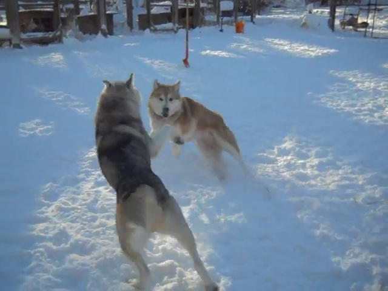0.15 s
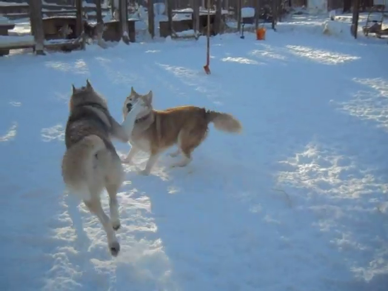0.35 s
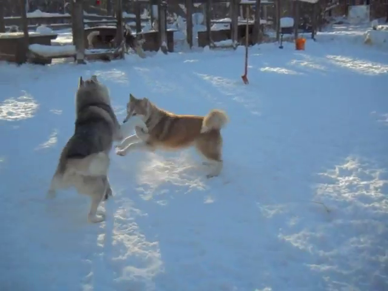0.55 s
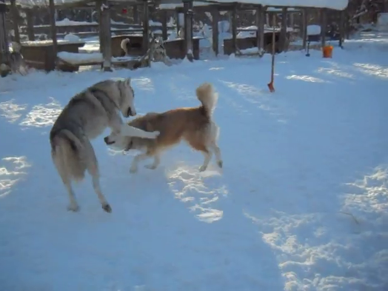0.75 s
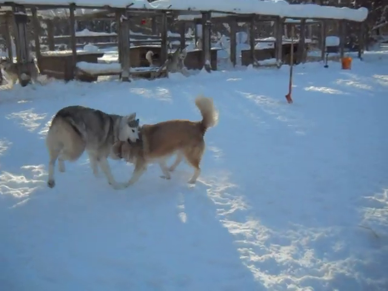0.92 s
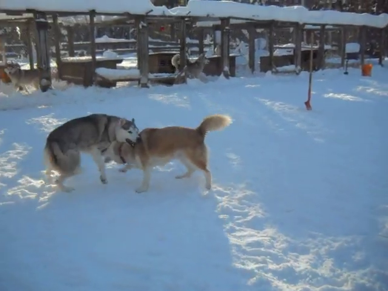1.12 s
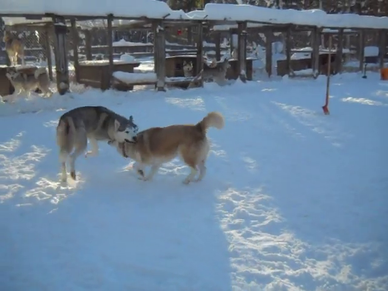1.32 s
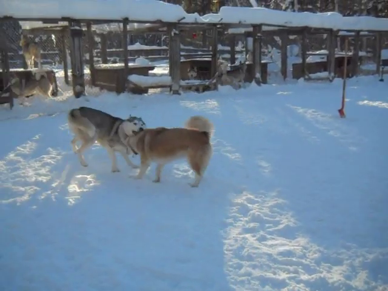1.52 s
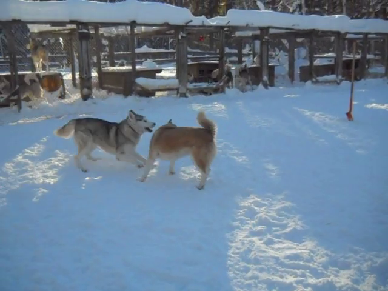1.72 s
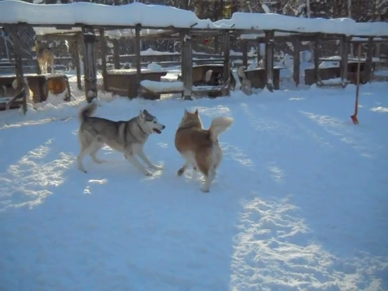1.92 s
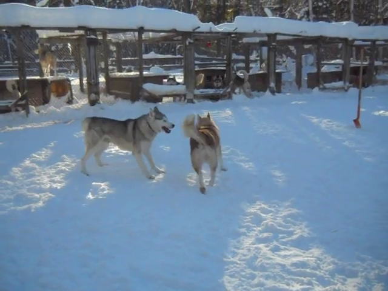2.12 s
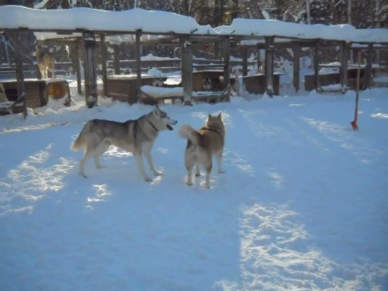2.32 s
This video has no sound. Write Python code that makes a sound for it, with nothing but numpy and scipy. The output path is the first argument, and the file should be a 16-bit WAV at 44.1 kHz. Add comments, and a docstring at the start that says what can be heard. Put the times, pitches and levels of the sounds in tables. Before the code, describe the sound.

Dog yelps and barks sharply in a snowy yard, with a whine and soft paw crunches

```python
"""Two dogs wrestle in a snowy yard: a sharp yelp, a harsh bark that runs into a whine, another bark over a low
grumble, a soft yip and small whimpers. Each call is a stack of harmonics, with jitter and noise where it is rough.
Paws crunch in the snow as swells of tiny random cracks, with dull thumps, over faint outdoor air made of noise.
The yard throws back a weak echo of the dogs. A small narrow-band recorder ducks when the sound gets loud,
recovers slowly and clips the loudest peaks."""
import sys
import numpy as np
from scipy import signal
from scipy.fft import rfft, irfft
from scipy.io import wavfile

SR = 44100
rng = np.random.default_rng(int(sys.argv[2]) if len(sys.argv) > 2 else 0)


def to_wav(s):
    """Save 16-bit WAV."""
    ch = np.atleast_2d(s).T  # columns
    pcm = np.round(np.clip(ch, -1, 1) * 32767)  # PCM
    wavfile.write(sys.argv[1], SR, pcm.astype(np.int16))


N = 103635   # length in samples
T = np.arange(N) / SR   # time in seconds

# The dogs' calls, one table each. Each row: time in seconds, pitch in Hz, level in dB, 2nd harmonic in dB
# and 3rd harmonic in dB (both relative to the level, before the mouth shapes them), roughness from 0 to 1.
YELP_PATH = [(.245, 735, -11.5, -23, -28.5, 0), (.257, 762.3, -4.5, -22.5, -22.5, 0.1),
             (.265, 830.8, 1, -9, -16.5, 0), (.279, 925.5, 11, -7, -22.5, .06),
             (.292, 945, 14, -24.5, -52.5, 0.07), (.324, 974.4, 10, -29, -23.5, 0),
             (.335, 1039, -1, -10, -47.5, 0.16), (.346, 1105, -3, -14.5, -44, 0),
             (.38, 1159, -15, -31.5, -35.5, 0.05)]
BARK_PATH = [(0.669, 622.4, -9.5, -13, -17.5, 0.029), (.683, 635.8, -4, -4.5, -7, 0.03),
             (0.692, 684, 5.5, -10, -17.5, 0.051), (0.71, 712.5, 6, -19, -19.5, 0.16),
             (0.716, 748.3, 7, -8, -21.5, 0.59), (0.743, 697.3, 2.5, -12, -18.5, 0.58),
             (0.768, 802.4, 3, -10, -22.5, 0.13), (0.777, 907, -5, -14, -25.5, .18),
             (0.797, 998, -19, 0, -25, 0.28)]
WHINE_PATH = [(.797, 1042, -11.5, -13.5, -38, 0.049), (0.828, 1130, -4.5, -22, -56.5, .004),
              (0.884, 1127, -1.5, -21.5, -57.5, 0.0037), (0.911, 1097, -2, -15.5, -58, 0.0012),
              (0.928, 1057, -3, -19, -58, 0.0018), (.963, 1142, -4.5, -18, -56, 0.0017),
              (0.992, 1104, -11, -21, -48.5, 0.0029), (1.007, 800, -16, -13, -29, 0.052),
              (1.016, 560, -38, -5.5, -31.5, 0.017), (1.026, 360, -37, 0, -28.5, 0.15)]
SECOND_BARK_PATH = [(1.175, 593.4, -26.5, -3.5, -9.5, 0.019), (1.188, 628, -18, 1.5, -9, 0.037),
                    (1.202, 604.3, -12, 5.5, 3, 0.27), (1.214, 699.5, -6, 0, -18, 0.46),
                    (1.238, 730, 3, -8.5, -31, 0.15), (1.254, 747, -3, -5.5, -30.5, 0.41),
                    (1.26, 1008, -4.5, -14.5, -36, 0.1), (1.278, 1041, -8.5, -17, -40, 0.047),
                    (1.304, 1084, -14.5, -13.5, -43.5, 0.0307)]
GRUMBLE_PATH = [(1.19, 165, -48, -13, -13.5, 0.34), (1.27, 182.3, -54.5, -13.5, -27, .4),
                (1.352, 165, -48, -28.5, -30, 1), (1.422, 145, -54, -25.5, -14, 0.49),
                (1.47, 130, -38, -25, -24, 0.71)]
YIP_PATH = [(1.563, 542, -35, -1.5, -14, 0.054), (1.578, 637, -31.5, -15, -38, 0.037),
            (1.597, 712, -17.5, -32, -26, .015), (1.611, 770, -14, -28, -33, 0.019),
            (1.623, 970, -19.5, -46, -40, 0.053), (1.657, 1036, -38.5, -40, -40.5, 0.16)]

# Mouth resonances that shape the harmonics. Each row: frequency in Hz, gain in dB.
MOUTH_RESONANCES = [(1400, -1), (1850, -3.5), (2200, 1), (2500, -3), (2850, 5), (3250, -3), (3600, 3.5),
                    (3950, -13.5)]
# Colour of the turbulence in the throat. Each row: frequency in Hz, relative level in dB.
RASP_SPECTRUM = [(200, -48), (400, -30.5), (600, -23.5), (900, -1.5), (1250, 5), (1550, -1.5), (1850, -2.5),
                 (2300, -6), (2800, -14), (3200, -33.5), (4000, -44)]
# Falling whimpers. Each row: start in seconds, length in seconds, first pitch in Hz, last pitch in Hz, level in dB.
WHIMPER_SLIDES = [(1.37, .035, 532, 370, -44.5), (1.674, 0.0372, 547, 363, -45),
                  (1.924, 0.059, 1050, 334, -42.5)]
# Paws and scuffles in the snow. Each row: centre in seconds, spread in seconds, level in dB.
SNOW_STEPS = [(.02, 0.039, -37.5), (.128, 0.0075, -28), (.2, 0.13, -35.5), (.226, 0.0014, -25),
              (.59, 0.014, -32.5), (.625, 0.016, -35.5), (1.145, 0.01, -42.5), (1.335, 0.016, -38),
              (1.46, .025, -44.5), (1.61, 0.011, -38.5), (1.665, 0.0076, -40.5), (1.792, 0.0018, -40.5),
              (1.864, 0.0011, -34)]
# Colour of the snow crunch. Each row: frequency in Hz, relative level in dB.
SNOW_SPECTRUM = [(30, 0.5), (120, -6), (294, 2), (463, -8.5), (700, 0.5), (1270, -2), (2080, -2),
                 (3550, -2.5), (4100, -8.5)]
# Dull low thumps in the scuffle. Each row: centre in seconds, spread in seconds, level in dB.
THUMP_TIMES = [(.278, 0.016, -23.5), (.595, 0.013, -31.5), (.692, 0.005, -18)]
# Colour of the thumps. Each row: frequency in Hz, relative level in dB.
THUMP_SPECTRUM = [(30, -7), (130, -11), (300, -8), (480, -6.5), (700, -4), (1500, -52.5)]
# Echoes off the snow, the fence and the kennels. Each row: delay in seconds, level in dB before the yard's filter.
YARD_ECHOES = [(.012, -25), (0.045, -32), (.074, -31), (.225, -44)]
# Colour of the outdoor air. Each row: frequency in Hz, relative level in dB.
AIR_SPECTRUM = [(30, -5), (100, 0), (266, -4.5), (435, -2.5), (700, -2.5), (1140, -6.5), (2000, -8),
                (2830, -9.5), (3620, -6.5), (4100, -23.5)]

# Voice
ATTACK_S, RELEASE_S = 0.002, 0.004
HARMONIC_FALL_DB = 11.5   # for each harmonic above the third
JITTER, SHIMMER = 0.15, 0.45   # wobble of pitch and of loudness at full roughness, as shares
FLUTTER_HZ = 220   # top rate of the random wobbles
RASP_DB = 4.5   # turbulence relative to the voice, at full roughness
HISS_DB, HISS_TOP_HZ = -38, 4258   # broad hiss relative to the voice, and its upper edge
WHIMPER_WAVER = 0.07   # share of the pitch

# Snow and air
GRAINS_PER_S, GRAIN_SPREAD_DB = 6600, 4
AIR_DB = -49

# Yard: levels before the filter, time for each tail to fall by 60 dB, and the band that the yard returns
TREES_DB, TREES_T60_S = -37.5, 3.2
KENNELS_DB, KENNELS_T60_S = -23, 0.22
YARD_LOW_HZ, YARD_HIGH_HZ = 614, 2500

# Recorder
OVERLOAD_DB, OVERLOAD_KNEE = 11, 4   # the microphone flattens peaks near this level; a higher knee bends sharper
LIMIT_DB, LIMIT_ATTACK_S, RECOVER_DB_PER_S = -6, 0.0036, 22
NARROW_STOP_HZ, FINAL_STOP_HZ = 4808, 15700   # each filter blocks everything above
CLIP_TOP = 0.71   # highest sample value, where full scale is 1


def voice(call):
    """A harmonic tone, shaped by the mouth, that breaks into jitter, shimmer and pulsed turbulence when rough."""
    s, *columns = np.transpose(call)
    pitch, db, second, third, rough = [np.interp(T, s, column) for column in columns]
    rough = np.clip(rough, 0, 1)
    before_start = np.maximum(s[0] - T, 0)
    after_end = np.maximum(T - s[-1], 0)
    gate = np.exp(-(before_start / ATTACK_S) ** 2 - after_end / RELEASE_S)

    shaky_pitch = pitch * (1 + JITTER * rough * flutter(FLUTTER_HZ))
    phase = 2 * np.pi * np.cumsum(shaky_pitch) / SR
    levels = [0, second] + [third - HARMONIC_FALL_DB * k for k in range(3)]
    mouth_hz, mouth_db = np.transpose(MOUTH_RESONANCES)
    tone = 0
    for k, level in enumerate(levels, 1):
        gain = from_db(level + np.interp(k * pitch, mouth_hz, mouth_db))
        shimmer = 1 + SHIMMER * rough * flutter(FLUTTER_HZ)
        tone = tone + gain * np.sin(k * phase) * shimmer

    # The turbulence swells once per cycle of the voice.
    pulsed_noise = rng.standard_normal(N) * (1 + 0.65 * np.cos(phase))
    rasp = from_db(RASP_DB) * rough * coloured(pulsed_noise, RASP_SPECTRUM)
    hiss = from_db(HISS_DB) * flutter(HISS_TOP_HZ)
    return gate * from_db(db) * (np.sqrt(2) * tone + rasp + hiss)


def whimpers():
    """Soft, nearly pure squeaks that slide down with a slight waver."""
    out = 0
    for s, length, from_hz, to_hz, db in WHIMPER_SLIDES:
        part = np.clip((T - s) / length, 0, 1)   # goes from 0 to 1 during the whimper
        slide = from_hz + (to_hz - from_hz) * part
        pitch = slide * (1 + WHIMPER_WAVER * flutter(FLUTTER_HZ))
        envelope = np.sqrt(2 * np.abs(np.sin(np.pi * part)))
        out = out + from_db(db) * envelope * np.sin(2 * np.pi * np.cumsum(pitch) / SR)
    return out


def paws():
    """Each step presses out a swell of tiny snow cracks of random size."""
    happens = rng.random(N) < GRAINS_PER_S / SR
    sign = rng.choice([-1, 1], N)
    size = from_db(GRAIN_SPREAD_DB * np.minimum(rng.exponential(1, N), 4))
    return swells(SNOW_STEPS) * coloured(happens * sign * size, SNOW_SPECTRUM)


def thumps():
    """Dull low thumps: short swells of low-coloured noise."""
    return swells(THUMP_TIMES) * coloured(rng.standard_normal(N), THUMP_SPECTRUM)


def yard(x):
    """A few dull echoes, a short scatter from the kennels and a faint tail from the trees."""
    response = np.zeros(N)
    for db, t60 in [(TREES_DB, TREES_T60_S), (KENNELS_DB, KENNELS_T60_S)]:
        fade = from_db(-60 * T / t60) * np.minimum(T / 0.01, 1)   # rises for 10 ms
        tail = rms_one(rng.standard_normal(N) * fade) / np.sqrt(N)   # total energy 1
        response += from_db(db) * tail
    for delay, db in YARD_ECHOES:
        response[int(delay * SR)] += from_db(db)
    returned = signal.fftconvolve(x, response)[:N]
    band = signal.butter(2, [YARD_LOW_HZ, YARD_HIGH_HZ], "band", fs=SR, output="sos")
    return signal.sosfilt(band, returned)


def outdoor_air():
    """Faint steady noise with the colour of the open air."""
    return from_db(AIR_DB) * coloured(rng.standard_normal(N), AIR_SPECTRUM)


def from_db(db):
    """Turn decibels into a gain."""
    return 10 ** (np.asarray(db) / 20)


def rms_one(x):
    """Scale a signal so that its rms (average strength) is 1."""
    return x / np.sqrt(np.mean(x ** 2) + 1e-20)


def coloured(x, spectrum):
    """Give a signal a spectrum by scaling its frequencies, then set its rms to 1."""
    hz, db = np.transpose(spectrum)
    bins = np.maximum(np.arange(N // 2 + 1) * SR / N, 1)
    gain = from_db(np.interp(np.log(bins), np.log(hz), db))
    return rms_one(irfft(rfft(x) * gain, N))


def flutter(hz):
    """Random wavering: noise with the rates above hz filtered down, rms 1."""
    lowpass = signal.butter(2, hz, fs=SR, output="sos")
    return rms_one(signal.sosfilt(lowpass, rng.standard_normal(N)))


def swells(rows):
    """Envelope of bell-shaped swells, whose powers add up."""
    power = sum(from_db(db) ** 2 * np.exp(-0.5 * ((T - s) / spread) ** 2) for s, spread, db in rows)
    return np.sqrt(power)


def scene():
    """Dogs and their echo, paws, low thumps and outdoor air."""
    calls = (YELP_PATH, BARK_PATH, WHINE_PATH, SECOND_BARK_PATH, GRUMBLE_PATH, YIP_PATH)
    dogs = sum(voice(call) for call in calls) + whimpers()
    return (dogs + yard(dogs) + paws() + thumps() + outdoor_air())[None]


def record(dry):
    """Microphone overload, gain control with a slow recovery, a narrow band, clipped peaks and a final cut."""
    squeeze = (1 + np.abs(dry / from_db(OVERLOAD_DB)) ** OVERLOAD_KNEE) ** (1 / OVERLOAD_KNEE)
    mic = dry / squeeze

    # The gain drops by as many dB as the peaks exceed the limit, then climbs back at a steady rate.
    over = np.maximum(20 * np.log10(np.abs(mic) + 1e-9) - LIMIT_DB, 0)
    recovery = RECOVER_DB_PER_S * T
    held = np.maximum.accumulate(over + recovery, axis=-1) - recovery
    keep = np.exp(-1 / (LIMIT_ATTACK_S * SR))
    reduction_db = signal.lfilter([1 - keep], [1, -keep], held)
    ducked = mic * from_db(-reduction_db)

    narrow_filter = signal.cheby2(12, 60, NARROW_STOP_HZ, fs=SR, output="sos")
    narrow = signal.sosfilt(narrow_filter, ducked)
    clipped = np.clip(narrow, -CLIP_TOP, CLIP_TOP)
    final_filter = signal.cheby2(12, 70, FINAL_STOP_HZ, fs=SR, output="sos")
    return signal.sosfilt(final_filter, clipped)


dry = scene()
out = record(dry)
to_wav(out)
```